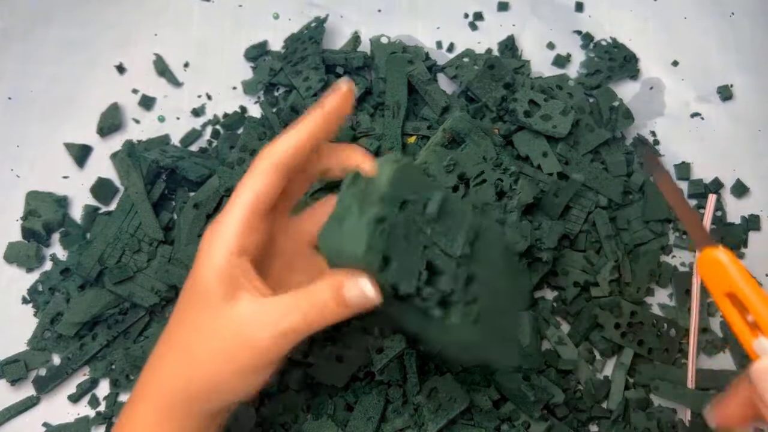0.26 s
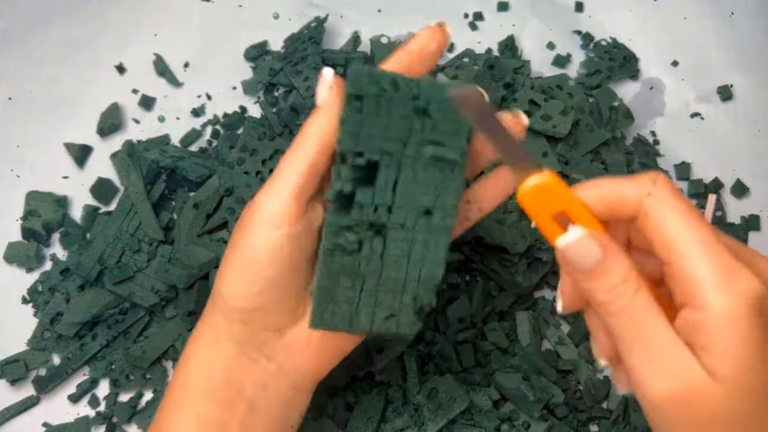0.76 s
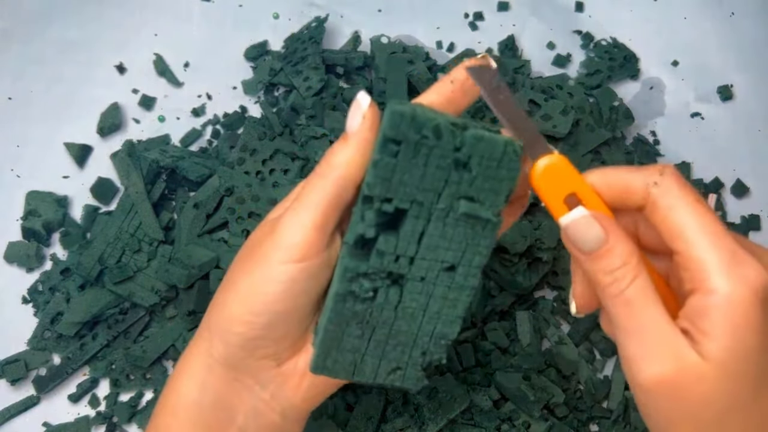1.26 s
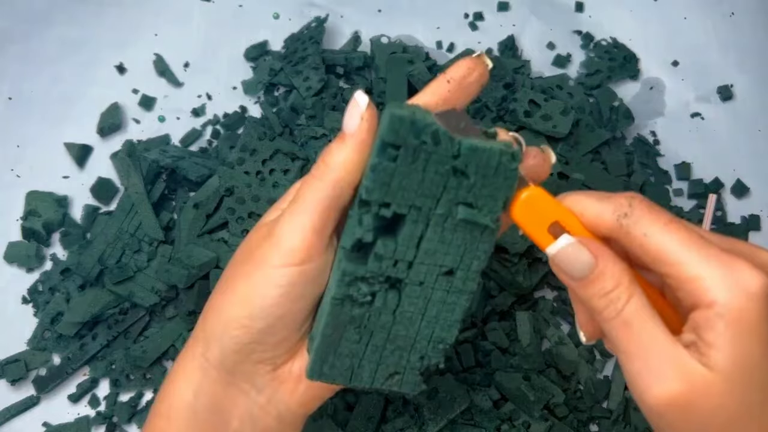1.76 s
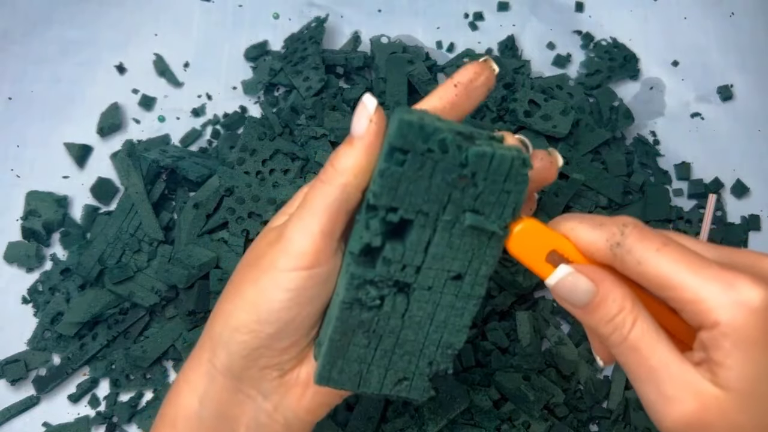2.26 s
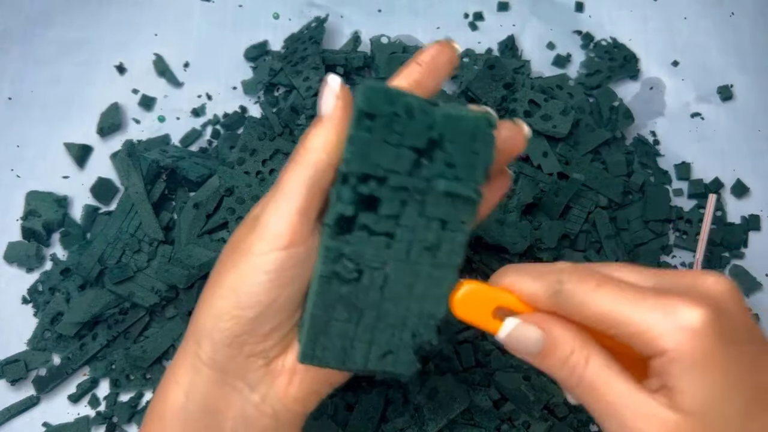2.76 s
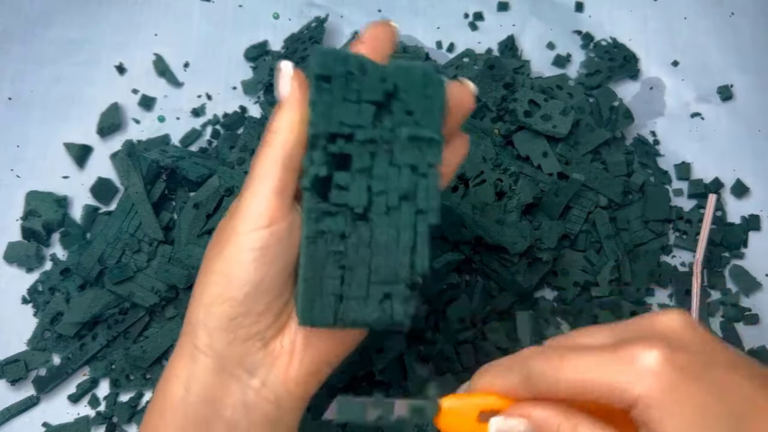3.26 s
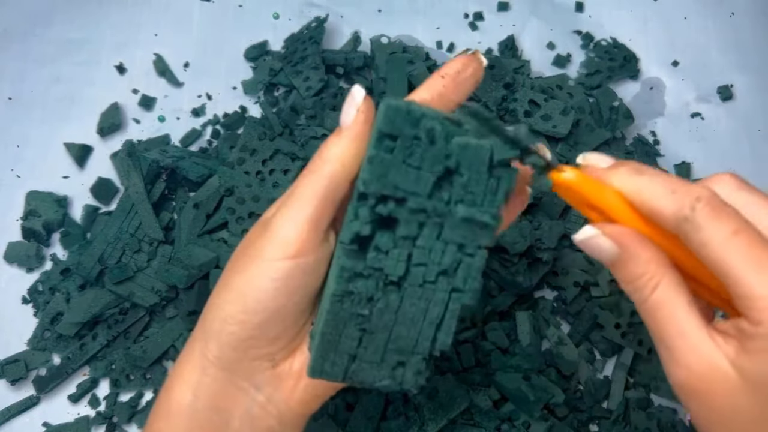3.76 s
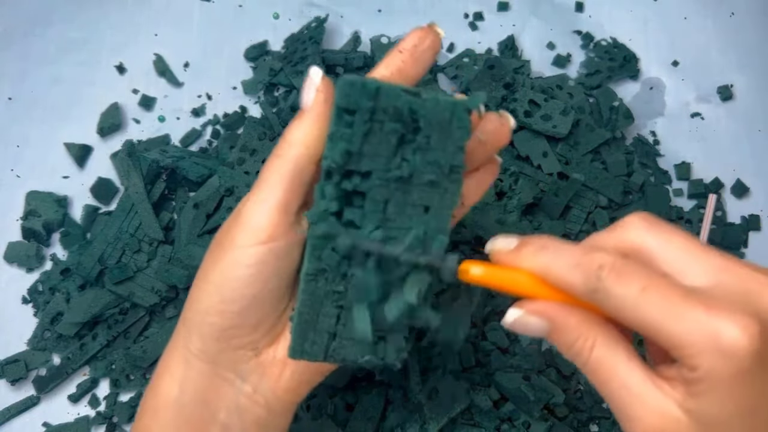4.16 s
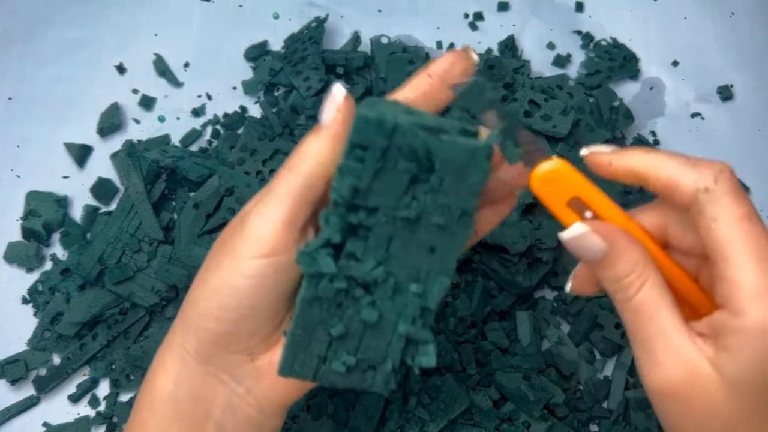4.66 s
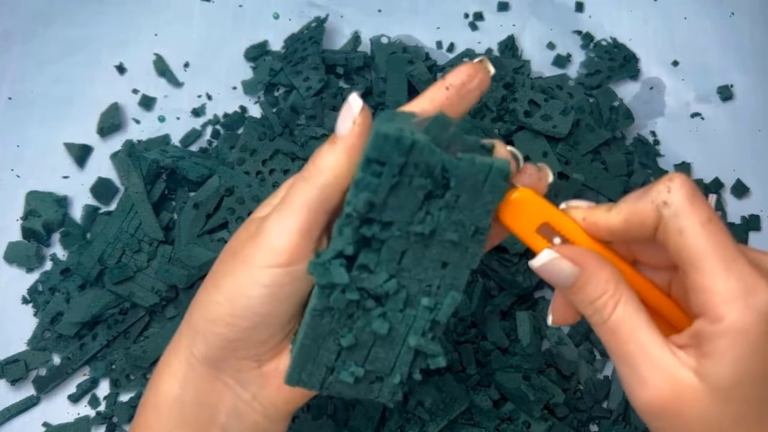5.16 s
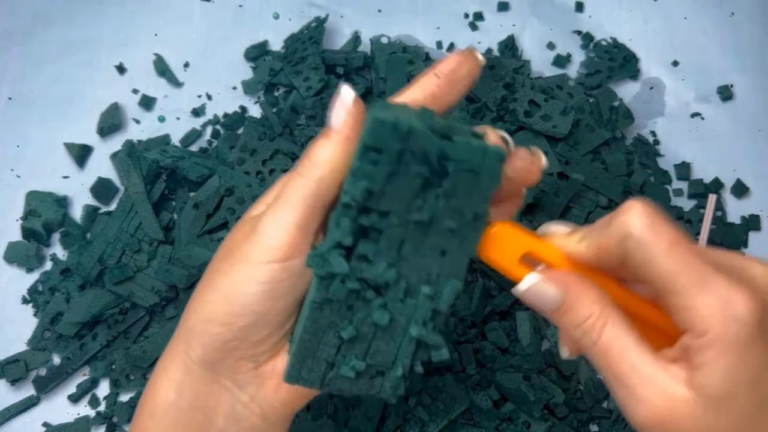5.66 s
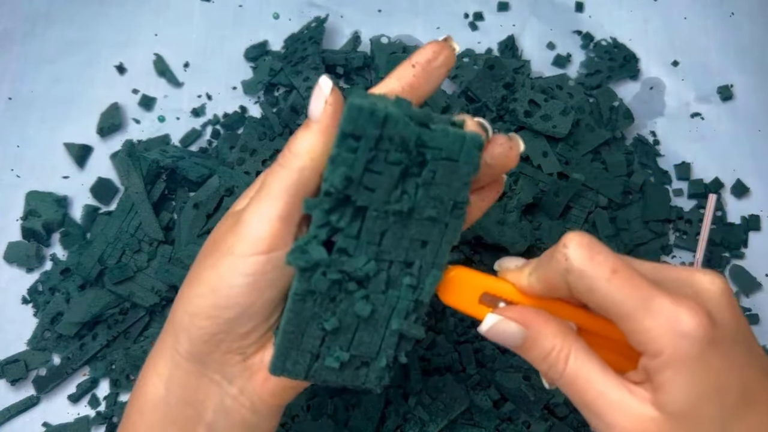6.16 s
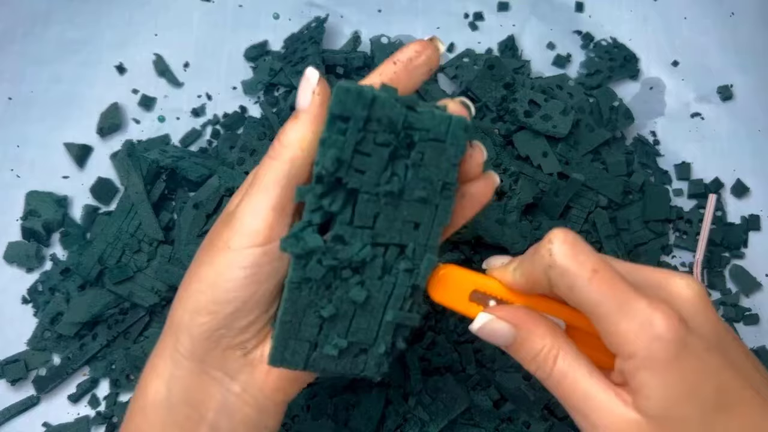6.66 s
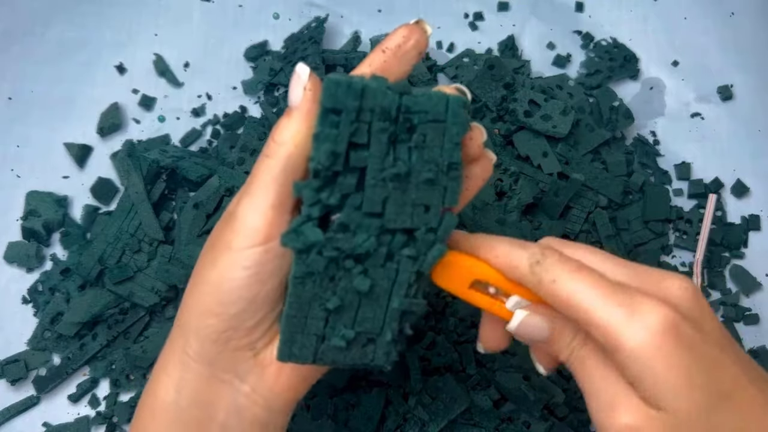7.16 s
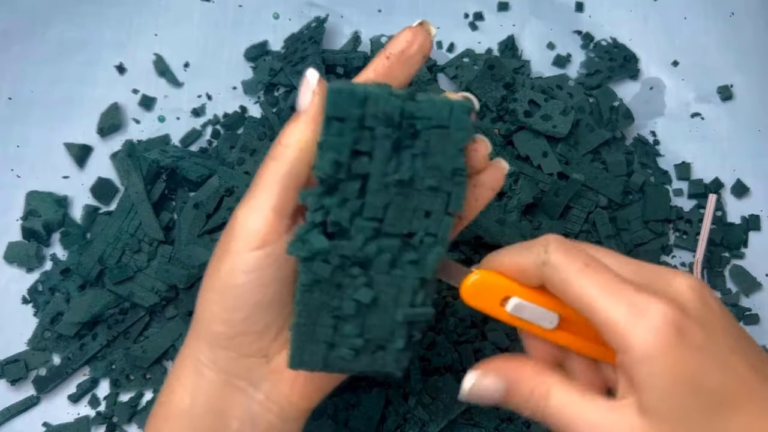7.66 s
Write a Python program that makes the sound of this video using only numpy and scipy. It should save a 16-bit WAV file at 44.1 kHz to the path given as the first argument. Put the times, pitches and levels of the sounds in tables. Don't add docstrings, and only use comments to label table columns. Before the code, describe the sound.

Very close stereo sound of a thin blade sawing dry, brittle foam in a room with a low steady fan hum. Light rustle and dull knocks come first, then crackling pushes build, sharp snaps break off chunks and crumbs shower down. After a quieter spell the cutting returns strongly, ending in a loud, crunching tear and a few last snaps.

```python
import sys
import numpy as np
from scipy import signal
from scipy.fft import rfft, irfft
from scipy.io import wavfile
from scipy.ndimage import uniform_filter1d, minimum_filter1d

SR = 44100
rng = np.random.default_rng(int(sys.argv[2]) if len(sys.argv) > 2 else 0)


def inscribe(sig):
    pcm = np.round(np.clip(np.atleast_2d(sig).T, -1, 1) * 32767)
    wavfile.write(sys.argv[1], SR, pcm.astype(np.int16))


def undo_db(level):
    steps = np.asarray(level, float) / 20
    return 10 ** steps


N = 349699

# (frequency [Hz], density [dB per Hz])
AIR_SPECTRUM = [(13, -37), (22, -27.5), (53, -6.5), (165, -3), (194, -1.5), (283, -7.5), (326, 0),
                (382, -9.5), (570, -8.5), (656, -13), (921, -13), (1460, -19), (2130, -31), (2600, -36),
                (3380, -58.5), (5720, -120)]
# (multiple of shaft rate [1], level [dB rms])
SHAFT_LINES = [(1.5, -51), (3, -61.5), (5, -54.5), (6, -42.5), (7, -43), (8, -49), (10, -49), (16, -55)]
# (time [s], peak [dB], frequency [Hz])
BUMPS = [(0.766, -11, 63), (0.809, -25.5, 59.2), (0.888, -27, 62), (0.946, -18.5, 84.5), (0.989, -25, 49.8),
         (1.948, -28.5, 49.3), (2.488, -26, 45.5), (3.849, -36, 43.1), (7.414, -20.5, 58.5),
         (7.518, -25.5, 65.7), (7.693, -49, 83.4)]
# (time [s], peak [dB], ring [Hz], rattle re ring [dB])
KNOCKS = [(0.404, -22, 380, -6), (0.93, -10, 480, -7), (0.944, -17, 430, -2.5), (0.963, -14, 222.4, -3),
          (1.002, -22.5, 189, -2.5), (1.048, -22.5, 183, -4.5), (2.5285, -14, 1060, -1.5),
          (2.535, -18, 560, -6), (2.55, -19, 339, -4), (7.371, -18, 450, -11), (7.395, -16, 376, -4),
          (7.419, -18, 177, 3), (7.45, -18, 227, 1.5), (7.48, -19.5, 151, -11), (7.519, -13.5, 183, -4)]
# (time [s], peak [dB], ring [Hz], crack re ring [dB])
SNAPS = [(0.3701, -31, 2100, 3.5), (0.402, -17, 3740, 2), (1.8082, -30.5, 4770, 9.5),
         (1.9704, -33.5, 5300, 6), (2.2812, -45, 3700, -2), (2.5285, -12, 1600, -2.5),
         (3.2775, -11, 3280, -11), (3.2866, -15, 3260, 1.5), (3.293, -6, 5200, 9), (3.3025, -11, 9200, -3),
         (3.9943, -42, 3590, 3), (5.4564, -2.5, 2250, 4.5), (5.895, -26.5, 5330, 2),
         (6.505, -21, 3300, 2.5), (6.6705, -20, 2400, -3), (6.854, -17, 3270, -1.5), (7.682, -7, 2050, 3),
         (7.7075, -3, 3500, .5), (7.8544, -15, 3500, -12)]
# (time [s], peak [dB], ring [Hz])
CRUNCHES = [
    (7.3669, -2.5, 3500),
    (7.3876, -7, 7600),
    (7.401, -3, 4480),
    (7.4182, -2, 7600),
    (7.433, -6.5, 7800),
    (7.476, -1.5, 8200),
    (7.5188, -3.5, 7900),
    (7.5325, -9, 7600),
]
# (frequency [Hz], density [dB per Hz])
CELL_SPECTRUM = [(700, -12), (1200, -11), (2000, -7), (3400, -4), (4200, -5.5), (5200, -2), (6200, -1),
                 (7300, 0), (8600, -2), (10000, -3), (11000, -5.5), (11900, -12), (13000, -15),
                 (15500, -18)]
FLOOR_DB = (-61, -66, -65)
# (time [s], crackle [dB rms], extra body from depth of cut [dB])
PRESSURE = [(0, -53, -.5), (.33, -41.5, 5), (.53, -49, -.3), (.9, -54.5, -.3), (1.37, -58, -3),
            (1.5, -39, -4), (2.45, -37, -3), (2.94, -39, -2.5), (3.62, -62, -.3), (3.96, -62, -.3),
            (4.12, -49.5, -4), (4.75, -54, -4), (5.4, -49, -4), (5.87, -42, .3), (6.12, -30, 1.5),
            (6.88, -38, 2.5), (7.05, -49.5, -2.5), (7.93, -52, 4)]
# (peak time [s], level [dB rms], rise [s per 10 dB], fall [s per 10 dB])
PUSHES = [(.2, -44, 0.07, 0.0462), (.406, -37, .008, .06), (5.28, -47, .08, .06), (.64, -45, .06, 0.0529),
          (.76, -47, 0.1, 0.05), (1.28, -52, 0, 0.3), (1.42, -46.5, -0.02, 0.6),
          (1.6, -35, 0.0275, -0.0239), (1.725, -28, 0.0475, .055), (1.815, -36.5, 0.0032, 0.02),
          (1.895, -35, 0.0145, 0.03), (2.009, -19, 0.0139, .022), (2.135, -34, 0.0176, 0.12),
          (2.31, -29, 0.0251, 0.0815), (2.7, -26, 0.0924, .04), (2.775, -18.5, 0.0395, 0.0492),
          (2.839, -25, 0.0307, 0.0254), (3.045, -25, 0.0389, 0.0668), (3.181, -21, 0.0764, .07),
          (3.7, -55, -0.12, -0.01), (4.025, -34.5, 0.0287, 0.0384), (4.35, -45, .1, 0.0223),
          (4.91, -49, -0.11, .04), (5.05, -47, -0.09, 0.0681), (5.705, -19, .03, .04),
          (5.755, -19.5, 0.0268, .03), (5.91, -30, .02, 0.0843), (5.999, -21.5, 0.0445, .045),
          (7.3, -39, -0.03, -0.01), (7.875, -38, 0.04, .025)]
# (time [s], depth [dB], half width [s])
LULLS = [(1.365, 5, .03), (1.785, 3, .015), (1.945, 5, 0.023), (2.09, 4, .03), (2.37, 3, .03),
         (3.65, 4, 0.028), (4.82, 9, .025), (4.985, 11, .03), (5.13, 7, .03), (6.065, 5, .02),
         (6.235, 6.5, .025), (6.57, 12, .04), (6.79, 3.5, .03)]
# (time [s], level [dB rms], fall [s per 10 dB], body, drag re crackle [dB])
SHOWERS = [
    (.371, -44, .04, 4, 2.5),
    (.932, -42, .11, 3, 9),
    (2.531, -32, .05, .3, 4),
    (3.301, -27, .085, -9, -13),
    (5.462, -28.5, 0.0962, -1, -6.5),
    (6.66, -40, 0.0868, 2, 0),
    (7.19, -39, 0.0554, 2.5, -6),
    (7.76, -40, .25, 5.5, -14),
]
# (frequency [Hz], left port lead [rad])
PORT_LEAD = [(0, 0), (800, 1), (1400, .4), (1900, 0), (2300, 1.5), (2900, 2.75), (3300, 1.3), (5150, 1.3),
             (5600, 3.1), (6600, 3.2), (7200, 6.2), (8800, 6.4), (9700, 9.3), (10900, 9.5), (11500, 12),
             (13000, 15.5)]
# (frequency [Hz], level re direct [dB])
SCATTER = [(40, -24), (130, -18), (290, -9), (640, -2), (1400, -7), (2100, -11), (2900, -8), (3400, -4),
           (4500, -5), (5800, -12), (11000, -12), (13000, -5)]

FAN_HZ, AIR_DB = 33.44, -30.5
KNOCK_T60_S, SNAP_T60_S, CRUNCH_T60_S, CRUNCH_CRACK_DB = .075, .0085, .02, 3.5
CELLS_PER_S, CELL_SPREAD_DB, CLUMP_DB = 9000, 2, 1.1334
PUSH_ROUND_DB = 2
BODY_DB, DRAG_DB, BODY_FOLLOWS, DRAG_FOLLOWS, MEAN_DB = -44.5, -48.5, 0.853, 1, -35
DEEP_S, DEEP_HALF_S, DEEP_DRAG_DB = 2.94, .34, 3.5
SHOWER_RISE_S = 0.00425
TEAR_S, TEAR_DB, TEAR_RISE_S, TEAR_HOLD_S, TEAR_SAG_DB, TEAR_FALL_S = 7.39, -11, .016, .145, 2.5, .13
TEAR_BODY_DB, TEAR_DRAG_DB, TEAR_CLUMP_DB = -11.5, -20.5, .8
STEP = 32
TOP_HZ, TOP_GATE_DB = 11950, -12.5
RAGGED = .37
MASK_DB, MASK_FROM_HZ, ATTACK_DB = -9, 2000, 9
SPECK_DB = -8.5
FLUTTER_HZ, FLUTTER_SHARE = 11000, 1.02


def rms_one(x):
    return x / np.sqrt(np.mean(x ** 2) + 1e-20)


def colour(x, points):
    hz = np.fft.rfftfreq(x.shape[-1], 1 / SR) + 1
    points_hz, points_db = np.transpose(points)
    gain = undo_db(np.interp(np.log(hz), np.log(points_hz), points_db))
    return irfft(rfft(x) * gain, x.shape[-1])


def band(x, low_hz, high_hz):
    return signal.sosfilt(signal.butter(2, [low_hz, high_hz], "band", fs=SR, output="sos"), x)


def low_pass(x, hz):
    return signal.sosfiltfilt(signal.butter(2, hz, fs=SR, output="sos"), x)


def drift(rate_hz):
    r = np.exp(-2 * np.pi * rate_hz / SR)
    slow = signal.lfilter([1], [1, -2 * r, r * r], rng.standard_normal(N + SR))[SR:]
    return rms_one(slow - slow.mean())


def add(out, s, sound):
    at = round(s * SR)
    out[..., at:at + sound.shape[-1]] += sound[..., :N - at]


def fan():
    air = rms_one(colour(rng.standard_normal((2, N)), AIR_SPECTRUM))
    air *= undo_db(AIR_DB - 2.5 + 0.426 * drift(8.8))
    turns = np.cumsum(FAN_HZ * (1 + 0.003705 * drift(1.454))) / SR
    hum = np.zeros((2, N))
    for multiple, db in SHAFT_LINES:
        level = undo_db(db + 3.5 + 2.25 * drift(2.93))
        hum += level * np.sin(2 * np.pi * (multiple * turns + rng.random((2, 1))))
    return air + hum


def bumps():
    out, t = np.zeros(N), np.arange(4000) / SR
    for s, peak_db, hz in BUMPS:
        turn = t * hz - 1.45
        hump = np.exp(-(turn / 0.757) ** 2)
        add(out, s, -undo_db(peak_db + .5) * np.cos(2 * np.pi * turn) * hump)
    return out


def loud_as(shape, x):
    burst = shape * x
    return burst * np.sqrt(np.sum(shape ** 2) / np.sum(burst ** 2, axis=-1, keepdims=True))


def blows(table, low_hz, high_hz, rise_s, width, bend):
    out, t = np.zeros((2, N)), np.arange(6000) / SR
    for s, peak_db, hz, t60_s, crack_db in table:
        noise = rng.standard_normal((2, len(t)))
        decay = undo_db(-60 * (t / t60_s) ** bend) + 0.1475 * undo_db(-14 * t / t60_s)
        shape = (1 - np.exp(-t / rise_s)) * decay
        ring = loud_as(shape, band(noise, hz / width, hz * width))
        crack = loud_as(shape, band(noise, low_hz, high_hz))
        add(out, s + 0.00078, undo_db(peak_db - 7.5) * (ring + undo_db(crack_db) * crack))
    return out


def knocks():
    thuds = [(s, db, hz, KNOCK_T60_S, rattle_db) for s, db, hz, rattle_db in KNOCKS]
    return blows(thuds, 100, 1895, rise_s=0.00116, width=1.324, bend=1.129)


def snaps():
    chunks = [(s, db, hz, SNAP_T60_S, crack_db) for s, db, hz, crack_db in SNAPS]
    chunks += [(s, db, hz, CRUNCH_T60_S, CRUNCH_CRACK_DB) for s, db, hz in CRUNCHES]
    return blows(chunks, 2000, 12500, rise_s=.0003, width=1.18, bend=1.6)


def swell(t, s, db, rise_s, fall_s, round_db=-0.39):
    under_db = 10 * np.where(t < s, (s - t) / rise_s, (t - s) / fall_s)
    return undo_db(2 * (db + round_db - np.hypot(under_db, round_db)))


def sawing(t):
    s, steady_db, depth_db = np.transpose(PRESSURE)
    power = undo_db(2 * np.interp(t, s, steady_db))
    power = power + sum(swell(t, *push, PUSH_ROUND_DB) for push in PUSHES)
    hang_db = sum(db * np.exp(-((t - at) / half_s) ** 2) for at, db, half_s in LULLS)
    saw_db = 10 * np.log10(power) - hang_db
    body_db = BODY_DB + np.interp(t, s, depth_db) + BODY_FOLLOWS * (saw_db - MEAN_DB)
    buried = np.abs(t - DEEP_S) < DEEP_HALF_S
    drag_db = DRAG_DB + DRAG_FOLLOWS * (saw_db - MEAN_DB) + DEEP_DRAG_DB * buried
    return undo_db(2 * np.array([saw_db, body_db, drag_db]))


def tear(t):
    since = t - TEAR_S
    attack_db = 10 * np.minimum(since, 0) / TEAR_RISE_S
    sag_db = TEAR_SAG_DB * np.clip(since / TEAR_HOLD_S, 0, 1)
    release_db = 10 * np.maximum(since - TEAR_HOLD_S, 0) / TEAR_FALL_S
    clump_db = TEAR_CLUMP_DB * drift(60)[::STEP].take(np.arange(len(t)), mode="clip")
    tear_db = TEAR_DB + attack_db - sag_db - release_db + clump_db
    return undo_db(2 * (tear_db + np.array([[0], [TEAR_BODY_DB], [TEAR_DRAG_DB]])))


def effort():
    t = np.arange(0, N + STEP, STEP) / SR
    power = sawing(t) + tear(t)
    for s, db, fall_s, body_db, drag_db in SHOWERS:
        share = undo_db(2 * np.array([[0], [body_db], [drag_db]]))
        power += swell(t, s, db, SHOWER_RISE_S, fall_s) * share
    return [np.interp(np.arange(N) / SR, t, db) for db in 10 * np.log10(power)]


def blade():
    crackle_db, body_db, drag_db = effort()
    burst = rng.random((2, N)) < CELLS_PER_S / SR
    size_db = CELL_SPREAD_DB * np.minimum(rng.exponential(1, (2, N)), 5)
    clicks = burst * undo_db(size_db) * rng.choice([-1, 1], (2, N))
    clumps = undo_db(CLUMP_DB * (drift(73) + .6 * drift(27)))
    cells = colour(clicks * clumps, CELL_SPECTRUM)
    wobble_db = .7 * drift(12)
    levels = crackle_db + wobble_db, body_db - wobble_db, drag_db
    under_4500, under_2500, under_750 = [low_pass(cells, hz) for hz in (4500, 2500, 750)]
    parts = cells - under_4500, under_4500 - under_2500, under_2500 - under_750
    out = np.zeros((2, N))
    for part, db, floor_db in zip(parts, levels, FLOOR_DB):
        out += np.hypot(undo_db(db), undo_db(floor_db)) * rms_one(part)
    return out


def ports(x):
    hz = np.fft.rfftfreq(N, 1 / SR)
    direct, scattered = rfft(x)
    side = np.array([[1], [-1]])
    scatter_hz, scatter_db = np.transpose(SCATTER)
    share = undo_db(np.interp(np.log(hz + 1), np.log(scatter_hz), scatter_db))
    lead = np.exp(.5j * side * np.interp(hz, *np.transpose(PORT_LEAD)))
    return irfft((direct + side * share * scattered) * lead / np.sqrt(1 + share ** 2), N)


def scene():
    return ports(fan() + bumps() + knocks() + snaps() + blade()) * undo_db(np.array([[.2], [-.2]]))


def thin(x):
    pair = np.array([x[0] + x[1], x[0] - x[1]]) / 2
    frame = dict(window="cosine", nperseg=2048, noverlap=1024, fs=SR)
    hz, s, bins = signal.stft(pair, **frame)
    width = 16
    lines = np.abs(bins[:, 1:]) ** 2
    power = lines.reshape(2, -1, width, len(s)).mean(axis=2)
    centre = hz[1:].reshape(-1, width).mean(axis=1)[:, None]
    strongest = -minimum_filter1d(-power.max(axis=0), size=3, axis=0) * (centre > MASK_FROM_HZ)
    treble = power[:, centre[:, 0] > 2 * MASK_FROM_HZ].sum(axis=(0, 1)) * width
    attack = treble > np.roll(treble, shift=1) * undo_db(2 * ATTACK_DB)

    wavering_db = uniform_filter1d(rng.normal(0, 4, power.shape), size=3)
    masked = (power < strongest * undo_db(2 * (MASK_DB + wavering_db))) & ~attack
    chance = uniform_filter1d(rng.random(power.shape) + rng.random(len(s)), size=3)
    flutter = (centre > FLUTTER_HZ) & (chance < FLUTTER_SHARE)
    specks = lines < np.repeat(strongest, width, axis=0) * undo_db(2 * SPECK_DB)
    lost = np.repeat(masked | flutter | (centre > TOP_HZ), width, axis=1) | specks

    patches = uniform_filter1d(rng.random(power.shape[1:]), size=3, axis=0)
    patches = uniform_filter1d(patches, size=3, axis=1)
    holes = (patches < RAGGED * centre / TOP_HZ) & (centre > TOP_HZ) & ~attack

    def without(gone):
        kept = bins.copy()
        kept[:, 1:] *= ~gone
        mid, side = signal.istft(kept, **frame)[1][:, :N]
        return np.array([mid + side, mid - side])

    thinned, ragged = without(lost), without(np.repeat(holes, width, axis=0))
    power_now = uniform_filter1d(np.mean(band(x, MASK_FROM_HZ, TOP_HZ) ** 2, axis=0), size=200)
    loud = power_now > undo_db(2 * TOP_GATE_DB)
    held = np.minimum(uniform_filter1d(loud * 1., size=500) * 8, 1)
    return thinned + held * (ragged - thinned)


def roll_off(x):
    return signal.sosfilt(signal.butter(12, 15940, fs=SR, output="sos"), x)


def record(dry):
    mix = thin(np.clip(dry, -1, 1))
    return roll_off(mix)


dry = scene()
out = record(dry)
inscribe(out)
```